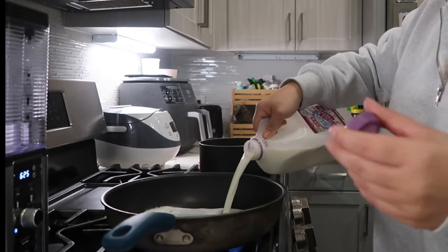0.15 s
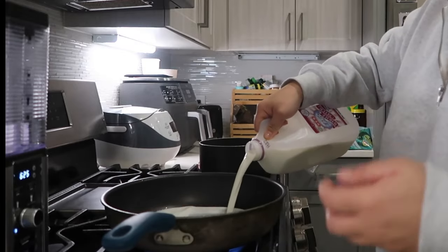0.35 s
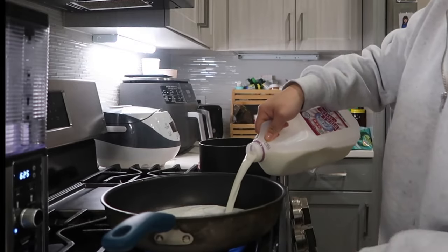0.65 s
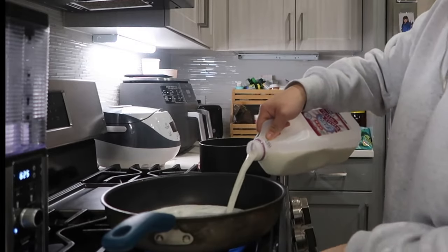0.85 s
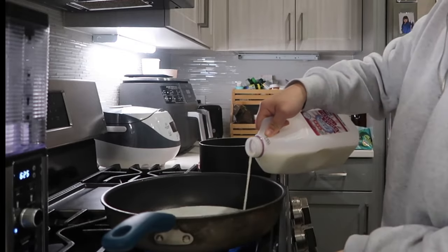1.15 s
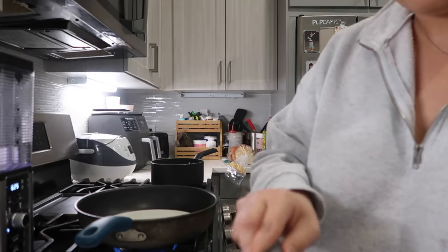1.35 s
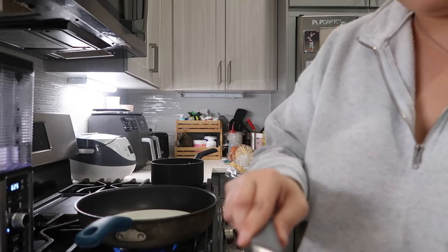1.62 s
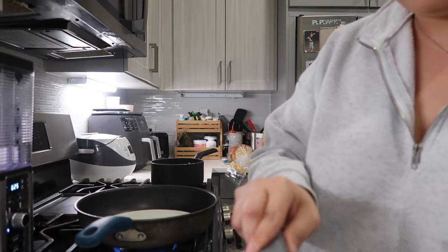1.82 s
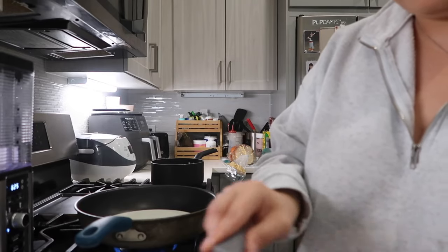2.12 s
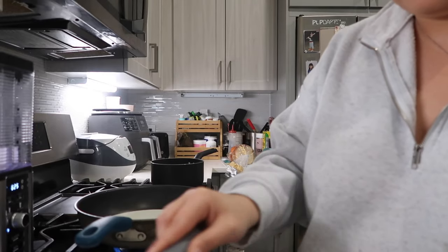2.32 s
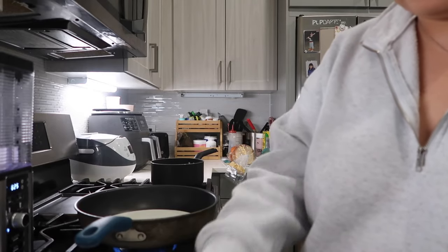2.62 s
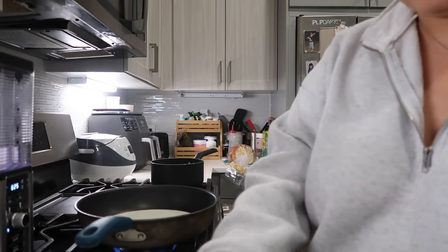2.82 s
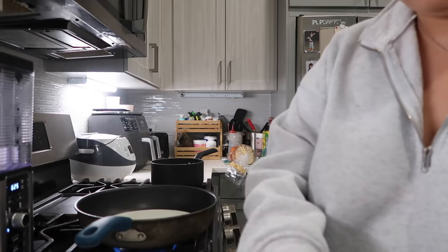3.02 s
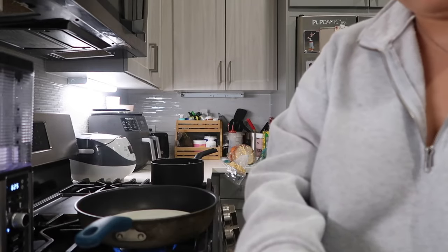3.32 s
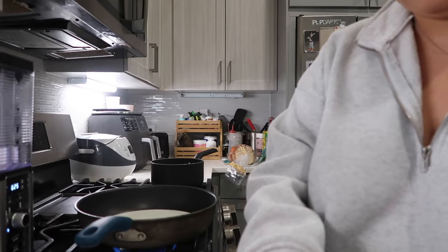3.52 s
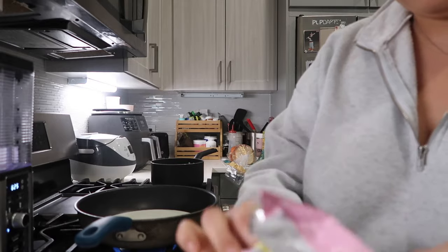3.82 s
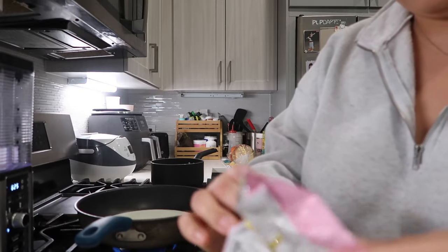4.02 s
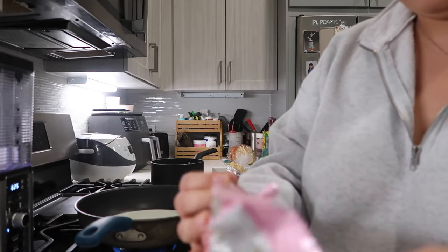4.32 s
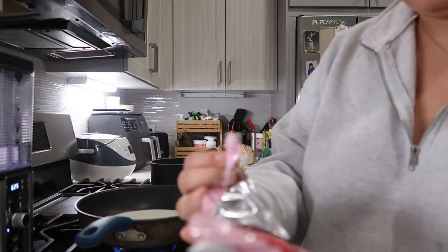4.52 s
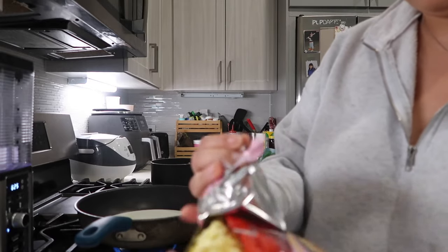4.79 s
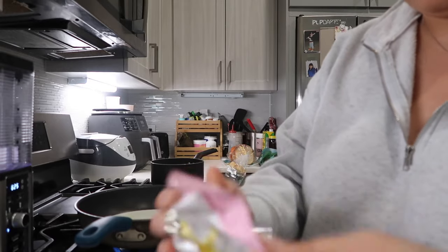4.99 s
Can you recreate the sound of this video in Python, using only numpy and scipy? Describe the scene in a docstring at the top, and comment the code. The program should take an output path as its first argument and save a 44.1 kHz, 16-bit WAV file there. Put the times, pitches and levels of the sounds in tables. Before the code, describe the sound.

Milk pours faintly into a pan under a cooker hood's hum, then a foil packet crackles, is snipped with scissors and pulled open.

```python
"""A foil-lined plastic packet is gripped, snipped open and pulled apart: each crease snaps as a click
burst with a pitched ring and a puff of the bag, over a crinkle of tiny ringing grains and foil fizz.
Before that, milk is poured into a pan: grain fizz, small ringing bubbles and gulps of the jug.
Scissor blades rasp and clack, then the steel is laid down as struck and skidding modes with squeaks.
A cooker hood, coloured noise plus motor tones, runs throughout; its level dips once and swells back."""
import sys
import numpy as np
from scipy import signal
from scipy.fft import rfft, irfft
from scipy.io import wavfile
from scipy.ndimage import uniform_filter1d, map_coordinates

SR = 44100
rng = np.random.default_rng(int(sys.argv[2]) if len(sys.argv) > 2 else 0)


def generate_wav(signal):
    """Clip the signal to [-1, 1] and save it as 16-bit WAV at the path in sys.argv[1]."""
    frames = np.transpose(np.atleast_2d(signal))
    scaled = np.clip(frames, -1, 1) * 32767
    pcm = np.round(scaled).astype(np.int16)
    wavfile.write(sys.argv[1], SR, pcm)


N = 227187
TIME = np.arange(N) / SR

# air noise of the hood: f/Hz, relative level/dB
HOOD_COLOUR = [(20, -47), (35, -14.5), (85, -2.5), (120, 4.5), (145, -1.5), (175, -11.5), (230, -7.5),
               (450, -13), (680, -13), (850, -23), (2800, -22), (4700, -30), (8000, -33.5), (14000, -58)]
# tones of the hood motor: f/Hz, level relative to the hood/dB
MOTOR_TONES = [(59.2, -13), (117, -20.5), (570.6, -21.5), (694.4, -17.5)]
# fizz of the milk: f/Hz, relative level/dB
MILK_COLOUR = [(300, -26), (1000, -0.5), (1450, -11), (1650, -0.5), (2300, -4), (2620, 4.5), (2850, -8),
               (3050, 5), (3250, -6), (3550, -0.5), (4600, -13.5), (6500, -17.5), (9000, -38), (14000, -47)]
# the jug gulps air and larger bubbles burst in the pan: t/s, level/dB, f/Hz, t60/s
GULPS = [(.09, -49, 335, .035), (.13, -54, 325, .12)]
# loudest creases that snap, plus the sharp strike at 2.886 s as the scissors touch down: # t/s, relative crack
# level/dB, relative patch ring level/dB, main pitch f/Hz, second pitch f/Hz
SNAPS = [(1.3107, -23, -19.5, 2780, 3710), (1.3512, -32, -11.5, 2040, 890), (1.3698, -11, -7.5, 2210, 2680),
         (1.3782, -8, -4.5, 2280, 2860), (1.3867, -13, -11, 2160, 2040), (1.4259, -16, -7.0, 2140, 2540),
         (1.4362, -19, -8.0, 1550, 1400), (1.4466, -23, -10.5, 1410, 614), (1.4575, -24, -4, 2680, 2130),
         (1.4614, -15.0, -7, 2140, 586), (1.4784, -13, -11, 980, 2140), (1.4808, -18, -6.5, 2040, 980),
         (1.4974, -19, -8.5, 1490, 1650), (1.5075, -9.0, -8, 613, 1400), (1.516, -15, -6.5, 2000, 533),
         (1.5218, -7, -7, 2980, 1180), (1.5339, -13, -9, 1960, 1050), (1.5594, -13.5, -14, 610, 1550),
         (1.6184, -11, -5, 2830, 2040), (1.634, -15, -16, 2050, 766), (1.6379, -11, -17, 2040, 3150),
         (1.6499, -14, -15, 3710, 584), (1.724, -14, -7.5, 1590, 3030), (1.7927, -18, -10.5, 1500, 514),
         (1.8176, -30, -6.0, 2060, 1450), (1.864, -14, -12.5, 3040, 2160), (1.8773, -11, -16, 1830, 1740),
         (2.1963, -8.5, -9, 1120, 2240), (2.2632, -15, -22, 2540, 560), (2.3708, -24.5, -31, 1940, 1080),
         (2.4866, -30.5, -31.5, 2400, 1660), (2.4926, -34.5, -34, 2640, 2000),
         (2.5168, -42, -32, 1650, 1940), (2.5689, -28, -32.5, 2040, 2040), (2.583, -29.5, -28, 1650, 1410),
         (2.7012, -22.5, -17, 1850, 2830), (2.8859, -3, -4.0, 2000, 3160), (3.101, -28, -18, 2660, 1330),
         (3.1404, -28, -20.5, 2260, 440), (3.255, -40, -18, 2960, 2780), (3.2731, -32, -18.5, 2680, 860),
         (3.3039, -36, -16.5, 1740, 1200), (3.3276, -27, -16.5, 2680, 1940),
         (3.3446, -16.5, -12.5, 2130, 2980), (3.3691, -13.5, -15, 3100, 520), (3.4031, -16, -18, 2280, 450),
         (3.455, -14, -25.5, 456, 2980), (3.4631, -4.5, -3.5, 3050, 2960), (3.4814, -23, -14.5, 3910, 2340),
         (3.5462, -15, -21, 2680, 2040), (3.5971, -21, -19.5, 2760, 1410),
         (3.6299, -24.5, -20.5, 2540, 1270), (3.6734, -31, -19.0, 2300, 443),
         (3.7243, -19.5, -13.5, 1170, 2410), (3.7516, -30, -23, 2040, 620), (3.806, -20.5, -14, 1970, 676),
         (3.8781, -37, -21.0, 2160, 2520), (3.9109, -15, -17.5, 2280, 930),
         (3.9683, -18.5, -17.5, 2160, 3300), (3.9981, -15.5, -17.5, 1420, 970),
         (4.0063, -18, -22.0, 450, 960), (4.0236, -30, -19.0, 990, 450), (4.0672, -35, -25, 3150, 4600),
         (4.0954, -13.5, -18, 1410, 453), (4.1074, -16, -10, 1800, 2600), (4.1481, -16, -13.5, 1280, 2400),
         (4.177, -12.5, -9, 3300, 3710), (4.2125, -14, -20, 2680, 2040), (4.2227, -15, -23, 2400, 4600),
         (4.2554, -10.5, -15, 3330, 1260), (4.2862, -26, -8, 2250, 3020), (4.3116, -20, -13, 2680, 816),
         (4.3438, -14, -12.5, 2020, 1130), (4.353, -27, -23, 2300, 1070), (4.3806, -5, -4.5, 2250, 1480),
         (4.3958, -15, -12, 2600, 3510), (4.4045, -26, -18, 2180, 2540), (4.4116, -9.5, -18, 1400, 470),
         (4.437, -4.5, -8, 2720, 3710), (4.444, -11, -8, 3400, 1990), (4.4503, -10, -7.5, 3380, 3910),
         (4.4796, -27, -14, 1480, 1010), (4.5315, -18, -15.5, 2280, 1010), (4.5828, -20, -17.5, 2280, 1840),
         (4.6654, -21.5, -20.5, 3330, 3150), (4.6801, -41, -21, 1930, 960), (4.7054, -11, -16.5, 2160, 574),
         (4.7733, -16, -14, 2580, 2568), (4.7826, -5.0, -9.5, 2580, 474), (4.8518, -22, -11.0, 2100, 810),
         (4.8852, -28, -16, 1830, 2400), (4.8991, -18, -15.5, 3910, 734), (4.9198, -19, -19, 1600, 690),
         (4.9477, -13, -15.5, 720, 2480), (4.9577, -20.0, -11.5, 2260, 1560),
         (4.9904, -13.5, -15, 1650, 1380), (4.9995, -21, -16.0, 2280, 4130),
         (5.0077, -28, -20.5, 3710, 450), (5.0147, -32.0, -15, 2900, 2190), (5.0975, -24, -22, 2380, 3710),
         (5.1168, -6.5, -6.5, 2280, 960)]
# edge of a cracking crease: f/Hz, relative level/dB
FILM_COLOUR = [(60, -28), (250, -5.5), (450, -10), (800, -10.5), (1500, 0), (2500, 3.5), (3800, -1.5),
               (5000, -12.5), (7500, -13.5), (9500, -36), (12500, -30.5), (16000, -47)]
# dull puff and rubbing of the bag's contents: f/Hz, relative level/dB
CONTENTS_COLOUR = [(40, -31), (130, -15), (260, 4.5), (350, -2.5), (470, 7.5), (800, -7), (1400, -17),
                   (4000, -46)]
# fine crinkle of the film: f/Hz, relative level/dB
CRINKLE_COLOUR = [(100, -8), (450, -14.5), (900, -3), (1600, -2.5), (2500, -1), (3500, -3.5), (5000, -15.5),
                  (7500, -20.5), (9500, -34), (16000, -61)]
# fizz of the foil lining: f/Hz, relative level/dB
FOIL_COLOUR = [(2500, -37), (4200, 7.5), (5500, 3), (7800, -1), (9500, -12), (12500, -24.5), (16000, -38)]
# hands squeeze the packet: start t/s, length/s, force level against an ordinary squeeze/dB
SQUEEZES = [(1.351, 0.07, 4), (1.445, 0.093, 8), (1.58, 0.03, 7.5), (1.62, 0.011, 10), (1.66, 0.6, -1),
            (1.803, 0.016, 7), (1.92, 0.027, 12.5), (2.203, 0.064, 4), (2.89, 0.077, 2), (3.04, 0.69, -6.5),
            (3.28, 0.14, -1.5), (3.467, 0.029, 5.5), (3.6, 0.47, -7), (3.9, 0.02, -3.5), (3.99, 0.6, -2.5),
            (4.15, 0.14, 3), (4.385, .03, 2.5), (4.432, 0.021, 5.5), (4.705, 0.1, -2.5), (4.89, 0.21, -0.5)]
# blades close: t/s, relative clack level/dB, relative thud level/dB, relative rasp level/dB
SNIPS = [(1.9327, 6.5, 4.5, -14.5), (1.9674, 2.5, -1, -17)]
# cutting blades: f/Hz, relative level/dB
BLADES_COLOUR = [(30, -22), (100, -9), (250, -11), (520, -9), (750, -5.5), (1100, 16.5), (2400, 11.5),
                 (4000, 3), (7500, -10.5), (12000, -14), (16000, -47)]
# scissors touch down: t/s, relative blow level/dB
TOUCHES = [(2.7262, -9), (2.732, -17), (2.79, -8.5), (2.886, -5), (2.907, -7), (2.924, -4.5), (2.935, -17),
           (2.948, -9), (3.003, -15)]
# scissors skid over the counter: start t/s, length/s, relative level/dB
SKIDS = [(2.729, 0.052, -26), (2.895, 0.012, -25.5), (2.925, 0.0067, -29.5), (2.985, 0.016, -33)]
# modes of the steel, damped by hand and counter: f/Hz, relative level/dB, t60/s
STEEL_MODES = [(1090, -15, .08), (1480, -9, .1), (2070, -5, .04), (2150, -7, .04), (2550, 1, .06),
               (2650, -2, .025), (3040, -6, .03), (3885, -11, .03), (4325, -7, .02), (4682, -11, .02),
               (7475, -18, .018)]
# rasp of steel on the counter: f/Hz, relative level/dB
COUNTER_COLOUR = [(60, -57), (500, -6.5), (1100, 0.5), (2400, 12), (3300, 4.5), (5000, -1.5), (6200, -7),
                  (8100, -6), (9500, -27), (15000, -44)]
# steel catches and squeaks: start t/s, length/s, level/dB
SQUEAKS = [(2.7265, 0.005, -21.5), (2.778, 0.0092, -23), (2.926, 0.01, -24), (3.003, 0.0028, -25)]
# side filter of the stereo image: f/Hz, side level against mid/dB
STEREO_WIDTH = [(60, -29.5), (300, -14), (700, -22), (1300, -23.5), (2500, -23), (4400, -3), (6500, -3),
                (9000, 7.5), (15000, 18)]

# hood level, and its dip: depth scale, time to sink, time constant of the swell back
HOOD_DB = -42.5
DIP_AT_S, DIP_DB, DIP_FALL_S, DIP_RECOVER_S = 1.7, 23, 0.052, 1.07
# the stream thins as the jug empties; POUR_HOLD_S is its length, POUR_RAMP_S its time per 20 dB
POUR_DB, POUR_THINS_DB_PER_S = -43, 4
POUR_START_S, POUR_HOLD_S, POUR_RAMP_S = 0.022, 1.4, 0.3
# bandwidth of a ringing patch at this pitch; it grows with the root of the pitch
PATCH_WIDTH_HZ, PATCH_AT_HZ = 390, 2000
# puff against the patch ring; larger, lower patches move more air
PUFF_DB, PUFF_DB_PER_OCTAVE = -16, 4
# all attack and release times below are times per 20 dB; the gripped film never rests completely
SQUEEZE_ATTACK_S, SQUEEZE_RELEASE_S, REST_DB = 0.073, 0.091, -18.5
# crinkle and rub at an ordinary squeeze; the rub takes this share of the squeeze's swing
CRINKLE_DB, RUB_DB, RUB_FOLLOWS = -34, -43, 0.83
# foil fizz against the crinkle before and after the cut; its extra share of the swing
FOIL_SHUT_DB, FOIL_OPEN_DB, FOIL_FOLLOWS = -16.5, -9, 0.65
# after the snips the film slides through the hands until this time
SLIDE_END_S = 2.45
CUT_ATTACK_S, CUT_RELEASE_S = 0.018, 0.037
SKID_ATTACK_S, SKID_RELEASE_S = 0.004, 0.13
SQUEAK_HZ, SQUEAK_ATTACK_S, SQUEAK_RELEASE_S = 2562, 0.003, 0.019
KITCHEN_T60_S, KITCHEN_DB = 0.22, -10.5
CUTOFF_HZ = 16100


def from_db(db):
    """Decibels to gain."""
    return 10 ** (np.asarray(db) / 20)


def rms_one(x):
    """Scales each channel to rms 1."""
    return x / np.sqrt(np.mean(x ** 2, axis=-1, keepdims=True) + 1e-20)


def unit_energy(x):
    """Scales each channel to energy 1."""
    return rms_one(x) / np.sqrt(x.shape[-1])


def at_hz(points, hz):
    """Reads a spectrum on a log-frequency axis."""
    knots, values = np.transpose(points)
    return np.interp(np.log(np.maximum(hz, 1)), np.log(knots), values)


def colour(x, spectrum):
    """Causal (minimum-phase) filter with the given spectrum."""
    size = 4096
    gain = from_db(at_hz(spectrum, np.arange(size // 2 + 1) * SR / size))
    # fold the cepstrum onto positive time
    cepstrum = irfft(np.log(gain))
    cepstrum[1:size // 2] *= 2
    cepstrum[size // 2 + 1:] = 0
    impulse = irfft(np.exp(rfft(cepstrum)))
    return signal.fftconvolve(x, impulse[None], axes=-1)[:, :x.shape[-1]]


def ring(x, hz, t60):
    """A two-pole resonator: a unit click sets off a dying sine of starting height 1."""
    r, w = from_db(-60 / (t60 * SR)), 2 * np.pi * hz / SR
    return signal.lfilter([0, np.sin(w)], [1, -2 * r * np.cos(w), r * r], x + 1e-18)


def add(out, s, sound):
    """Mixes a sound in at time s."""
    start = min(int(s * SR), N)
    out[:, start:start + sound.shape[-1]] += sound[:, :N - start]


def noise(spectrum):
    """Two unrelated noises of the given colour, rms 1."""
    return rms_one(colour(rng.standard_normal((2, N)), spectrum))


def burst(decay_s, size=2048):
    """A dying flurry of noise, whitened before a final fade."""
    fade = np.exp(-TIME[:size] / decay_s)
    flurry = rfft(rng.standard_normal((2, size)) * fade)
    flat = irfft(flurry / (np.abs(flurry) + 1e-9))
    return unit_energy(flat * np.sqrt(fade))


def grains(per_s, spread_db):
    """Clicks at random moments, with exponentially spread levels and random signs."""
    out = np.zeros((2, N))
    at = np.flatnonzero(rng.random(N) < per_s / SR)
    sizes = from_db(spread_db * np.minimum(rng.exponential(1, N)[at], 2.5))
    positive = rng.integers(0, 2, (2, N), dtype=bool)[:, at]
    out[:, at] = sizes * np.where(positive, 1, -1)
    return out


def evened(x, window_s):
    """Holds the slow level near 1 and leaves the grain."""
    power = uniform_filter1d(np.mean(x ** 2, axis=0), int(window_s * SR) + 1)
    return x / np.sqrt(power + 1e-9)


def drift(per_s):
    """Smooth chance that takes a new value so many times a second; rms 1."""
    knots = rng.standard_normal(4096)
    return rms_one(map_coordinates(knots, [TIME * per_s], order=2, mode="wrap"))


def strokes(rows, attack_s, release_s):
    """Level in dB of (start, length, dB) strokes that rise, hold and fall; the strongest leads."""
    levels = []
    for s, length, db in rows:
        before = np.maximum(s - TIME, 0) / attack_s
        after = np.maximum(TIME - s - length, 0) / release_s
        levels.append(db - 20 * (before + after))
    return np.max(levels, axis=0)


def hood(air_db=-1):
    """Air rumbles through the hood over steady motor tones; the level dips once and swells back."""
    tones = 0
    for hz, db in MOTOR_TONES:
        turns = hz * TIME + rng.random((2, 1))
        tones = tones + from_db(db) * np.sqrt(2) * np.sin(2 * np.pi * turns)
    since = np.maximum(TIME - DIP_AT_S, 0)
    dip = np.minimum(since / DIP_FALL_S, 1) * np.exp(-since / DIP_RECOVER_S)
    return from_db(HOOD_DB - DIP_DB * dip) * (from_db(air_db) * noise(HOOD_COLOUR) + tones)


def milk(fizz_per_s=6000, fizz_db=-2.0, bubble_db=-9):
    """Milk fizzes as the stream flutters, tiny bubbles ring as they burst, and the jug gulps."""
    flutter = from_db(1.7 * drift(per_s=35))
    fizz = rms_one(colour(grains(fizz_per_s, spread_db=5.0), MILK_COLOUR))
    pitches = np.geomspace(1400, 4000, num=14)
    bubbles = rms_one(sum(ring(grains(per_s=10, spread_db=5.0), hz, 60 / hz) for hz in pitches))
    stream_db = strokes([(POUR_START_S, POUR_HOLD_S, POUR_DB)], POUR_RAMP_S, POUR_RAMP_S)
    stream_db = stream_db - POUR_THINS_DB_PER_S * TIME
    out = from_db(stream_db) * flutter * (from_db(fizz_db) * fizz + from_db(bubble_db) * bubbles)
    for s, gulp_db, hz, t60 in GULPS:
        gulp = rms_one(ring(burst(decay_s=t60 / 2, size=8192), hz, t60))
        add(out, s, from_db(gulp_db) * gulp)
    return out


def patch_ring(hz, decay_s):
    """A small patch of film rings briefly: a click burst through a band-pass."""
    half = PATCH_WIDTH_HZ * np.sqrt(hz / PATCH_AT_HZ) / 2
    band = signal.butter(2, [max(hz - half, 20), hz + half], "band", fs=SR, output="sos")
    return unit_energy(signal.sosfilt(band, burst(decay_s)))


def snaps(decay_s=0.0022, patch_s=0.00079, second_db=-3.0, level_db=11, after_s=0.0086, after_db=-15):
    """Each crease cracks and sets off two smaller ones; its patch rings at two pitches, the bag puffs."""
    out = np.zeros((2, N))
    for s, edge_db, ring_db, hz, second_hz in SNAPS:
        crack = unit_energy(colour(burst(decay_s), FILM_COLOUR))
        second = from_db(second_db) * patch_ring(second_hz, patch_s)
        patch = unit_energy(patch_ring(hz, patch_s) + second)
        puff = unit_energy(colour(burst(2 * decay_s), CONTENTS_COLOUR))
        octaves_up = np.log2(np.sqrt(hz * second_hz) / PATCH_AT_HZ)
        puff_db = ring_db + PUFF_DB - PUFF_DB_PER_OCTAVE * octaves_up
        add(out, s, from_db(edge_db) * crack + from_db(ring_db) * patch + from_db(puff_db) * puff)
        small_db = max(edge_db, ring_db) + after_db
        for delay in np.cumsum(rng.uniform(0.218, 1, 2)) * after_s:
            small = patch_ring(hz * 2 ** rng.uniform(-0.46, 0.79), decay_s)
            add(out, s + delay, from_db(small_db) * small)
    return from_db(level_db) * out


def squeezing():
    """Force of the hands on the packet in dB; practically silent before the first grip."""
    force_db = strokes(SQUEEZES, SQUEEZE_ATTACK_S, SQUEEZE_RELEASE_S)
    return np.where(TIME > SQUEEZES[0][0], np.maximum(force_db, REST_DB), -120)


def clumps():
    """Creases give way in avalanches that start at once and die in ms; sliding film is more even."""
    starts = np.abs(grains(per_s=150, spread_db=2.5)[0])
    surge = signal.lfilter([1], [1, -np.exp(-1 / (.0045 * SR))], starts + 1e-18)
    sliding = (TIME > SNIPS[-1][0]) & (TIME < SLIDE_END_S)
    return evened((surge + np.where(sliding, 1.5, .6))[None], window_s=.04)


def crinkle(force_db, per_s=1800, cycles=13, hiss=0.45):
    """Small creases tick at many pitches; foil fizzes, more once cut open, and the contents rub."""
    pitches = np.geomspace(600, 9000, num=18)
    ticks = 0
    for hz in pitches:
        clicks = grains(per_s / len(pitches), spread_db=0.5)
        ticks = ticks + np.sqrt(hz) * rms_one(ring(clicks, hz, cycles / hz))
    film = rms_one(colour(ticks, CRINKLE_COLOUR)) + hiss * noise(CRINKLE_COLOUR)
    foil_db = np.where(TIME < SNIPS[-1][0], FOIL_SHUT_DB, FOIL_OPEN_DB) + FOIL_FOLLOWS * force_db
    foil = from_db(foil_db) * rms_one(colour(grains(per_s=6000, spread_db=1.5), FOIL_COLOUR))
    rub = rms_one(colour(grains(per_s=900, spread_db=0.5), CONTENTS_COLOUR))
    contents = from_db(RUB_DB + RUB_FOLLOWS * force_db) * rub
    skin = from_db(CRINKLE_DB + force_db) * (evened(film, window_s=0.046) + foil)
    return clumps() * (skin + contents)


def snips(decay_s=0.0017, thud_hz=480, thud_t60=0.0064, level_db=18, rasp_db=-1):
    """The blades rasp through the film and clack shut; each clack sets off a low, short thud."""
    cuts = [(s, 0, db) for s, _, _, db in SNIPS]
    cut_db = rasp_db + strokes(cuts, CUT_ATTACK_S, CUT_RELEASE_S)
    rasp = rms_one(colour(grains(per_s=2700, spread_db=4.0), BLADES_COLOUR))
    out = from_db(cut_db) * evened(rasp, window_s=0.02)
    for s, peak_db, thud_db, _ in SNIPS:
        clack = unit_energy(colour(burst(decay_s), BLADES_COLOUR))
        thud = unit_energy(ring(clack, thud_hz, thud_t60))
        add(out, s, from_db(level_db) * (from_db(peak_db) * clack + from_db(thud_db) * thud))
    return out


def scissors(chatter_per_s=1400, ring_db=-1.5, rasp_db=-4.5, touch_db=7):
    """Steel chatters on the counter; shifting contact feeds modes unevenly and bends their pitch."""
    patchy_db, shifts_per_s, bend_s = 4, 70, 3e-5
    skid_db = strokes(SKIDS, SKID_ATTACK_S, SKID_RELEASE_S)
    drive = evened(grains(chatter_per_s, spread_db=-2), window_s=0.014) * from_db(skid_db)
    for s, blow_db in TOUCHES:
        add(drive, s, from_db(blow_db + touch_db) * burst(decay_s=0.0054))
    steel = 0
    total = np.sqrt(sum(from_db(db) ** 2 for _, db, _ in STEEL_MODES))
    for hz, db, t60 in STEEL_MODES:
        size = np.linalg.norm(ring(np.eye(1, SR // 2), hz, t60))
        feed = drive * rms_one(from_db(patchy_db * drift(shifts_per_s)))
        mode = ring(feed, hz, t60) * from_db(db) / (size * total)
        # reading at wavering times bends the pitch
        bent = TIME + bend_s * drift(shifts_per_s)
        steel = steel + np.array([np.interp(bent, TIME, channel) for channel in mode])
    scrape = unit_energy(colour(np.eye(1, SR // 10), COUNTER_COLOUR))
    rasp = signal.fftconvolve(drive, scrape, axes=-1)[:, :N]
    return from_db(ring_db) * steel + from_db(rasp_db) * rasp


def squeak():
    """Stick and slip sound one mode of the steel as a sine; its pitch wavers and its level shakes."""
    hz = SQUEAK_HZ + 55 * drift(per_s=160)
    level_db = strokes(SQUEAKS, SQUEAK_ATTACK_S, SQUEAK_RELEASE_S) + 2.8 * drift(per_s=400)
    turns = np.cumsum(hz) / SR + rng.random((2, 1))
    return np.sqrt(2) * from_db(level_db) * np.sin(2 * np.pi * turns)


def kitchen(x, first_echo_s=0.0026, wall_hz=7000):
    """Counter and cupboards return a dense, slightly duller tail."""
    t = TIME[:SR // 2]
    tail = rng.standard_normal((2, len(t))) * from_db(-60 * t / KITCHEN_T60_S) * (t > first_echo_s)
    tail = signal.lfilter(*signal.butter(1, wall_hz, fs=SR), unit_energy(tail))
    return x + from_db(KITCHEN_DB) * signal.fftconvolve(x, tail, axes=-1)[:, :N]


def scene():
    """Mixes (mid, side) pairs and decodes them to stereo; the sides differ mainly in the treble."""
    packet = snaps() + crinkle(squeezing())
    mid_side = kitchen(packet + snips() + scissors() + squeak()) + hood() + milk()
    side = colour(mid_side[1:], STEREO_WIDTH)
    return mid_side[0] + side * np.array([[1], [-1]])


def record(dry):
    """The loudest peaks overload softly; a steep low-pass cuts the top."""
    clipped = dry / (1 + dry ** 6) ** (1 / 6)
    lowpass = signal.ellip(10, .2, 90, CUTOFF_HZ, fs=SR, output="sos")
    return signal.sosfilt(lowpass, clipped)


dry = scene()
out = record(dry)
generate_wav(out)
```